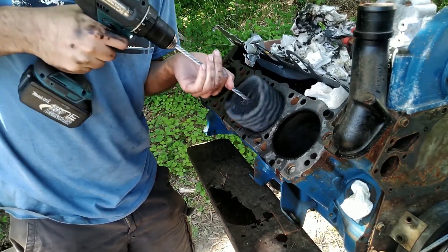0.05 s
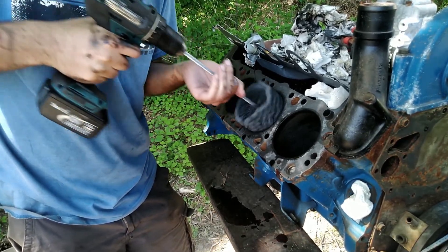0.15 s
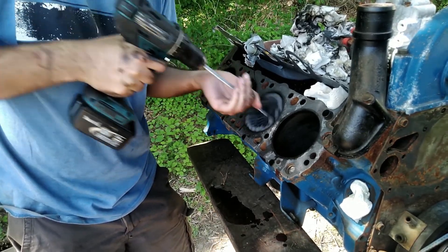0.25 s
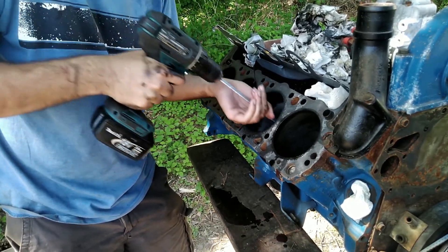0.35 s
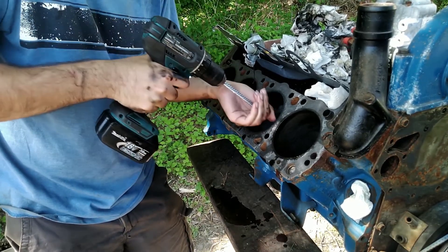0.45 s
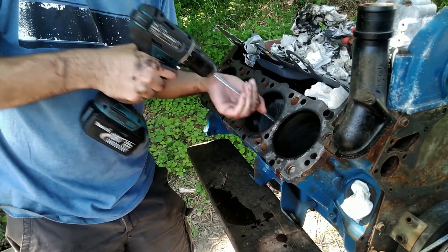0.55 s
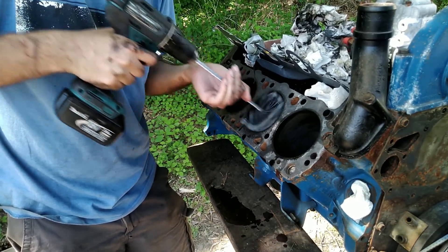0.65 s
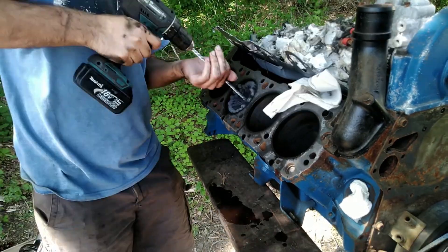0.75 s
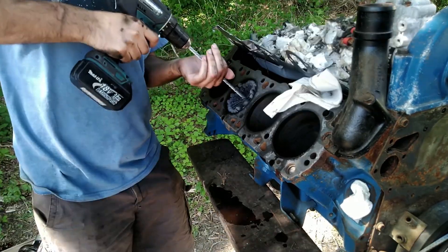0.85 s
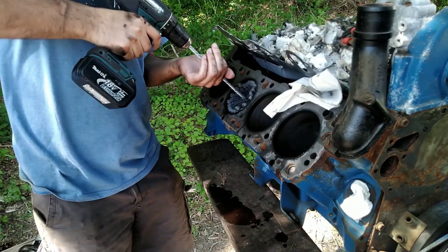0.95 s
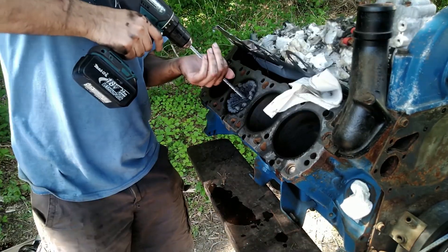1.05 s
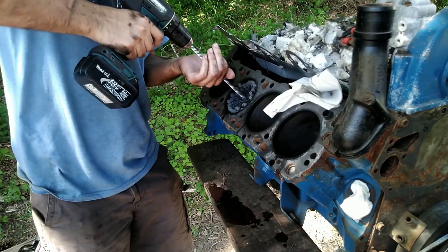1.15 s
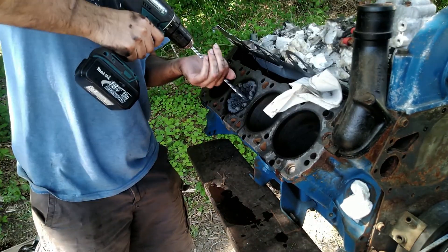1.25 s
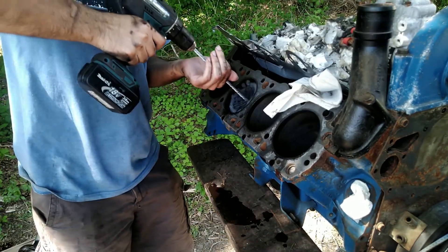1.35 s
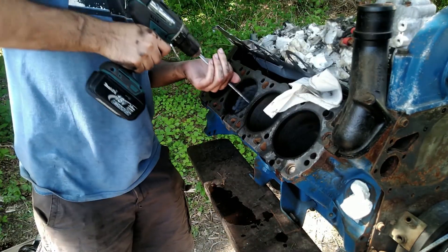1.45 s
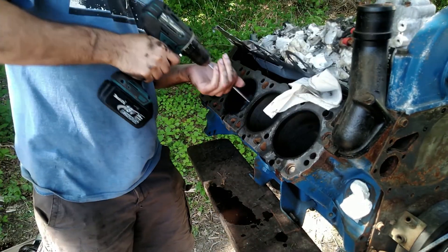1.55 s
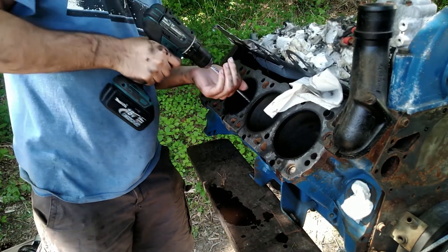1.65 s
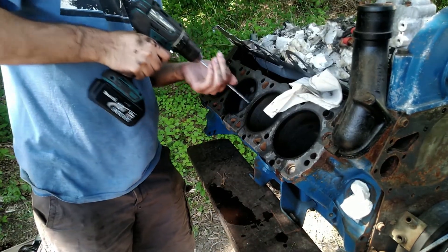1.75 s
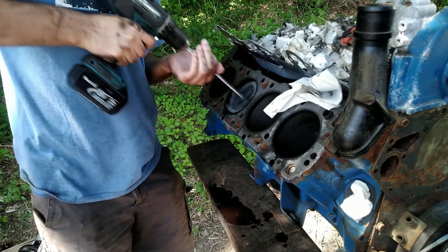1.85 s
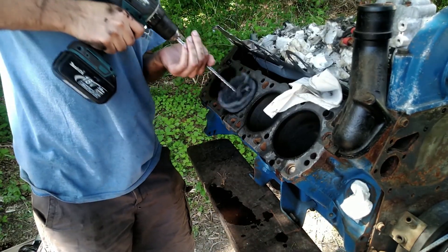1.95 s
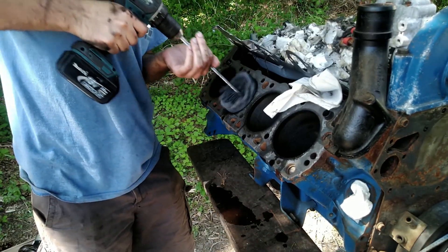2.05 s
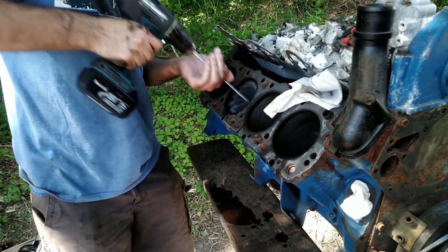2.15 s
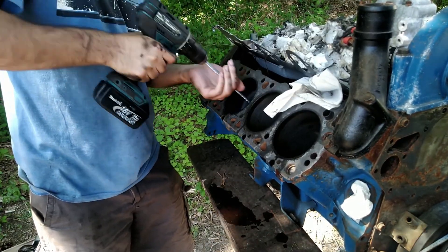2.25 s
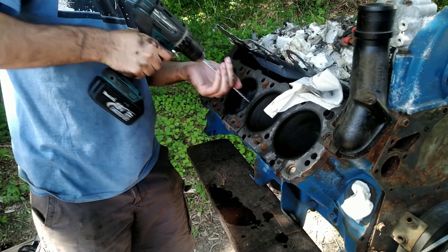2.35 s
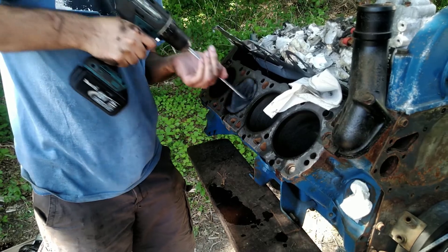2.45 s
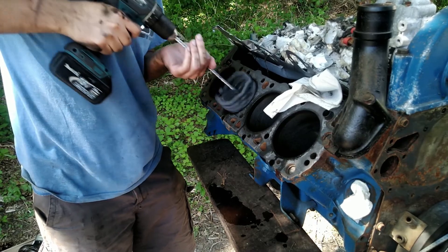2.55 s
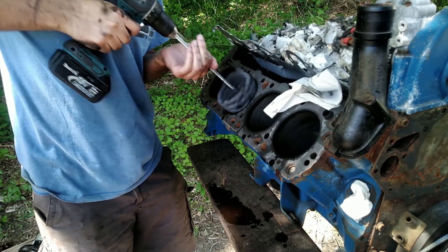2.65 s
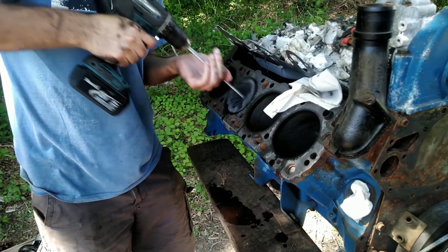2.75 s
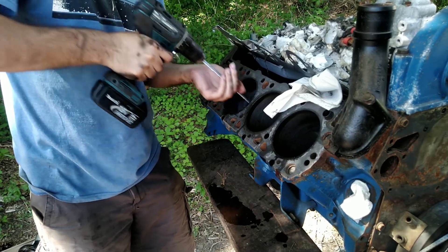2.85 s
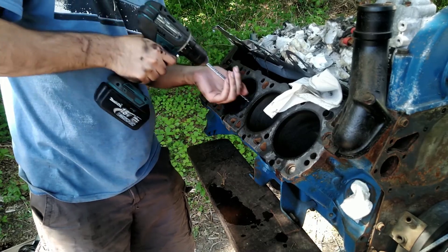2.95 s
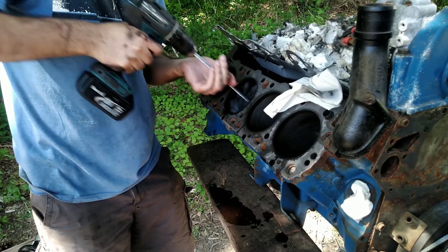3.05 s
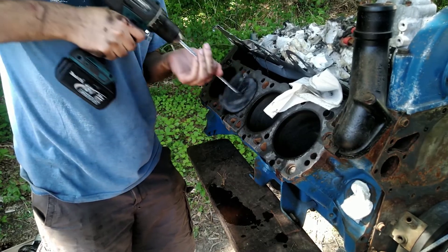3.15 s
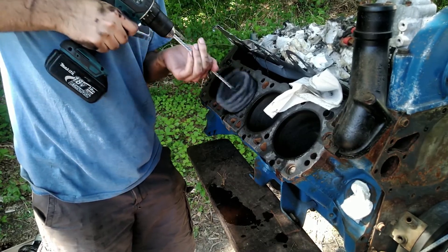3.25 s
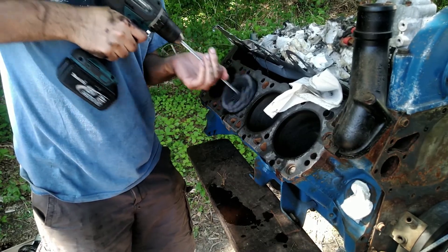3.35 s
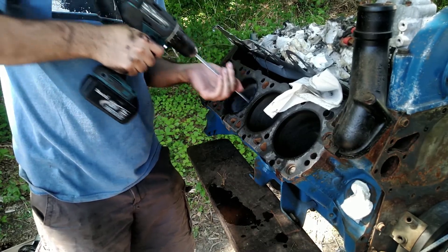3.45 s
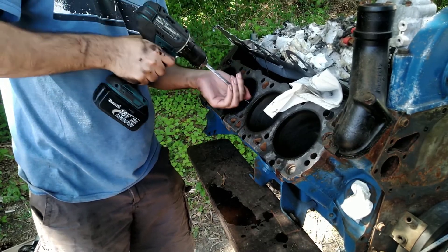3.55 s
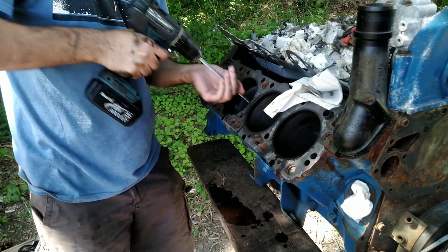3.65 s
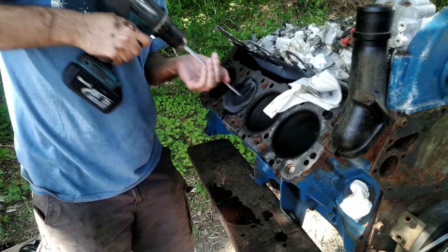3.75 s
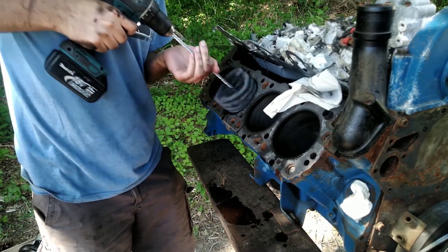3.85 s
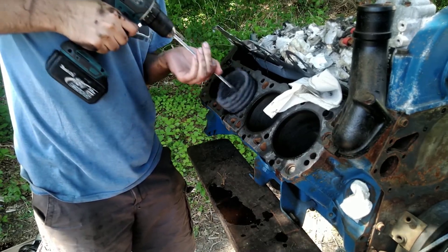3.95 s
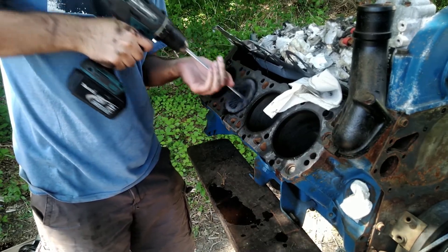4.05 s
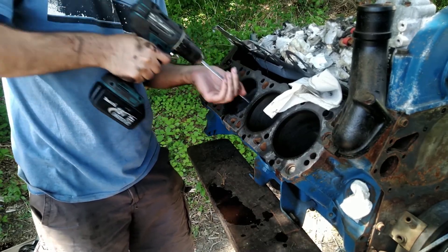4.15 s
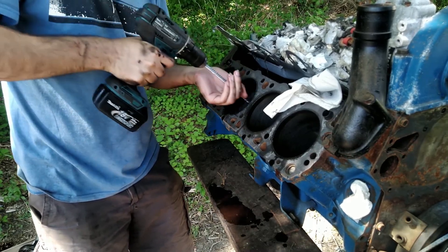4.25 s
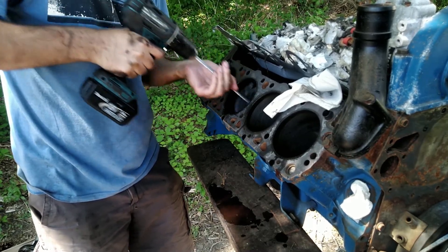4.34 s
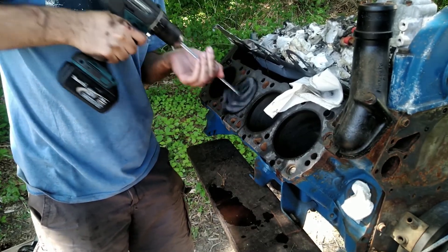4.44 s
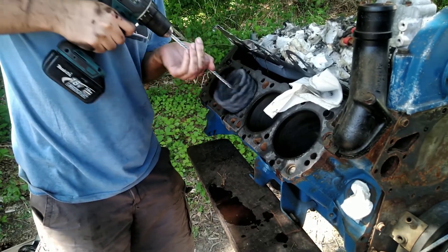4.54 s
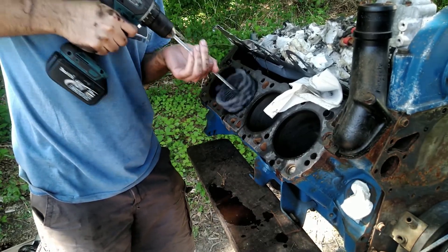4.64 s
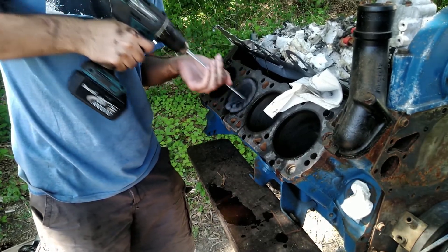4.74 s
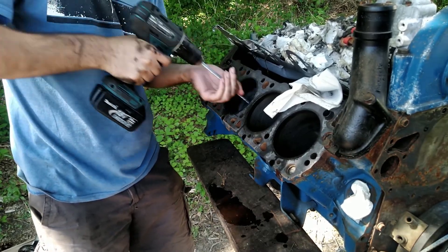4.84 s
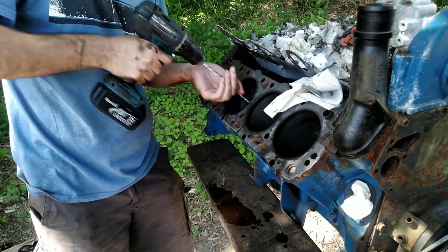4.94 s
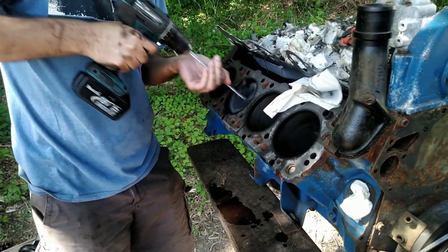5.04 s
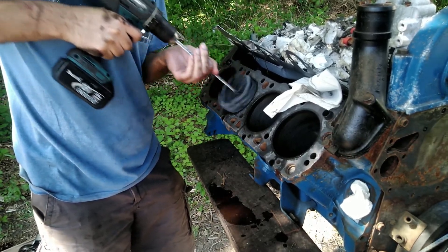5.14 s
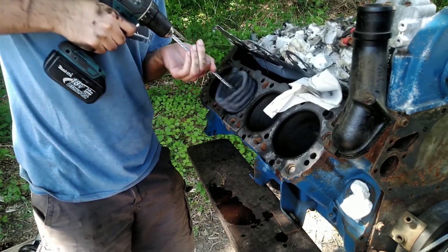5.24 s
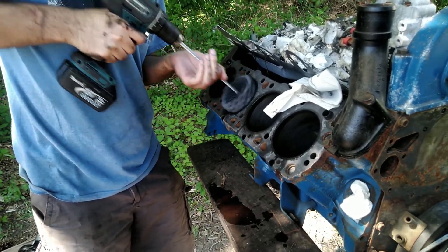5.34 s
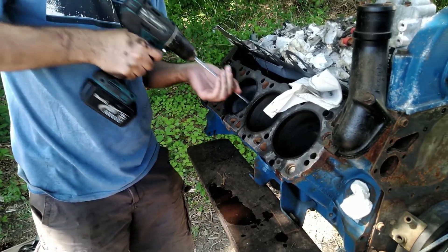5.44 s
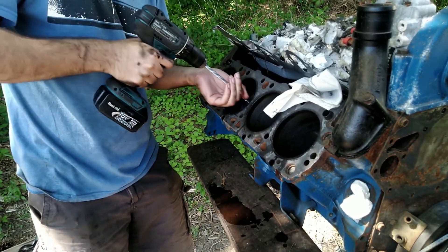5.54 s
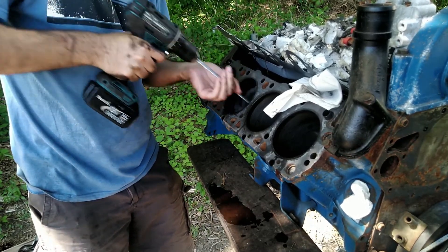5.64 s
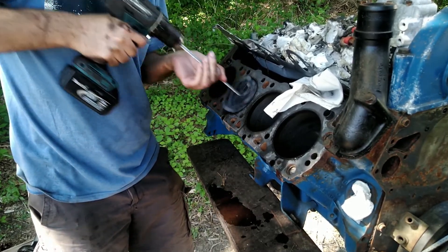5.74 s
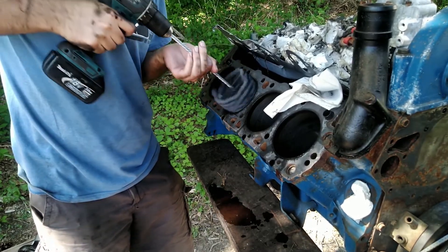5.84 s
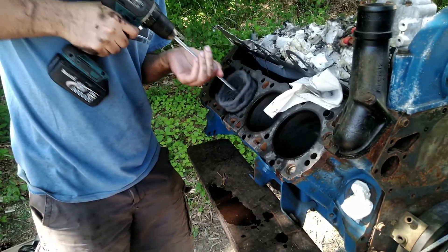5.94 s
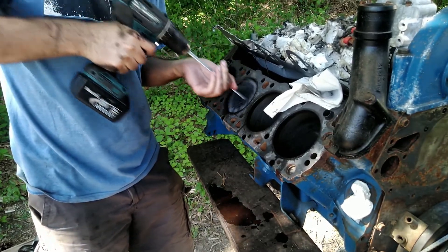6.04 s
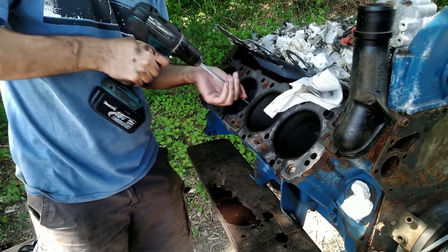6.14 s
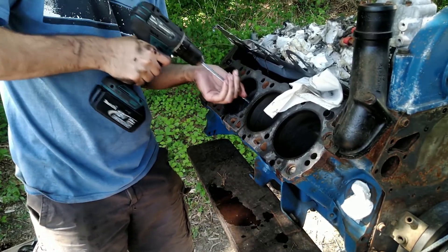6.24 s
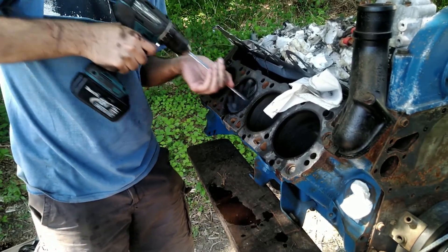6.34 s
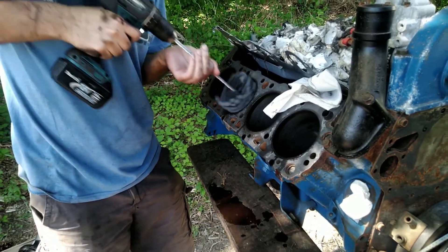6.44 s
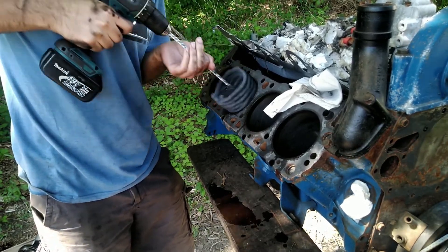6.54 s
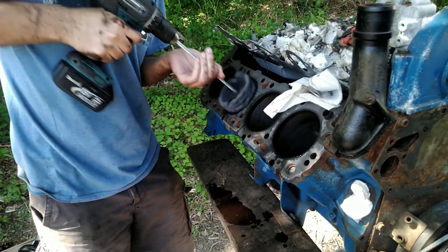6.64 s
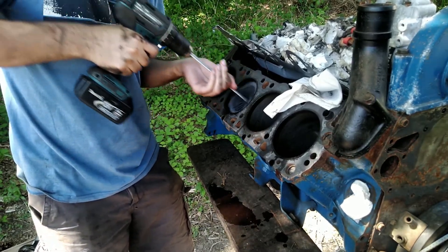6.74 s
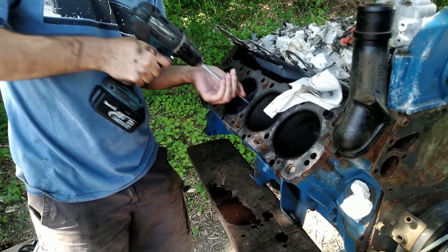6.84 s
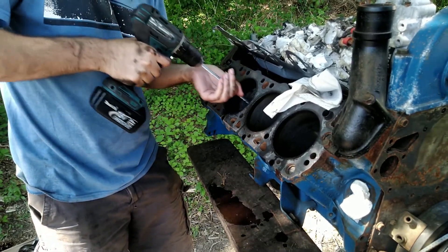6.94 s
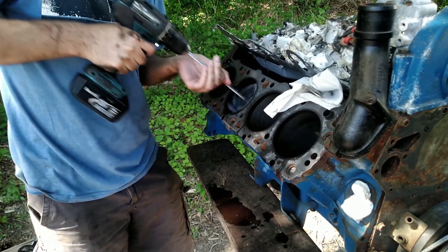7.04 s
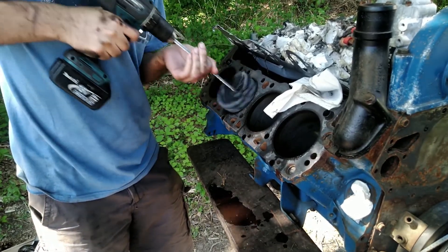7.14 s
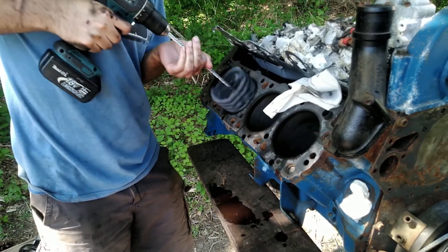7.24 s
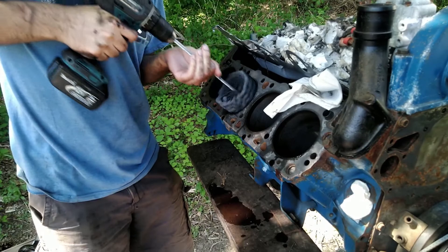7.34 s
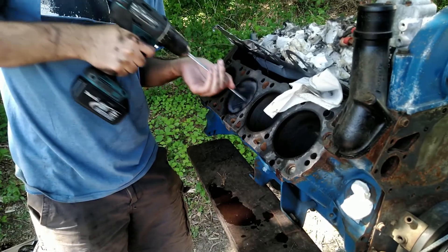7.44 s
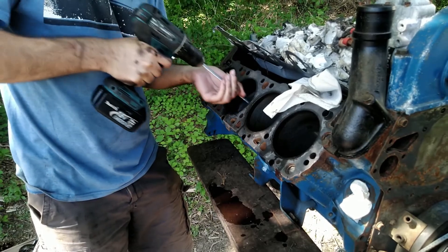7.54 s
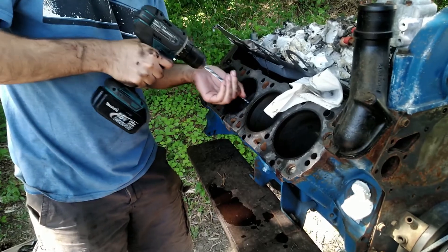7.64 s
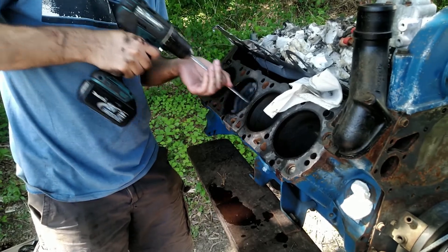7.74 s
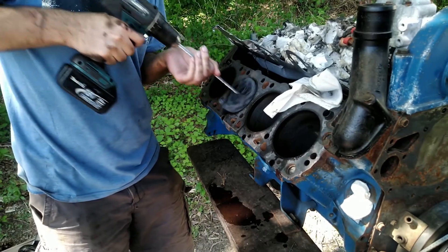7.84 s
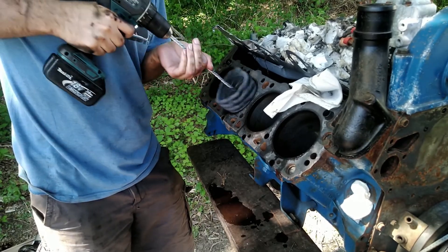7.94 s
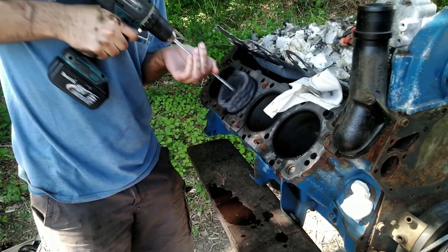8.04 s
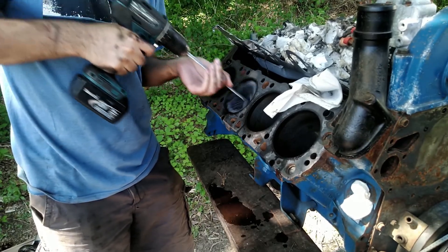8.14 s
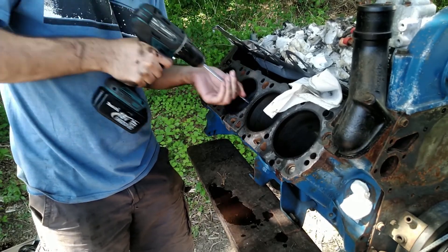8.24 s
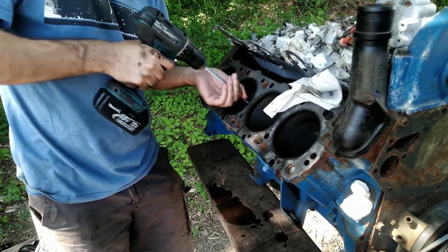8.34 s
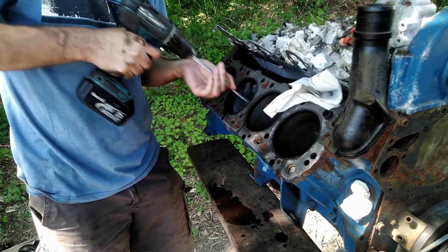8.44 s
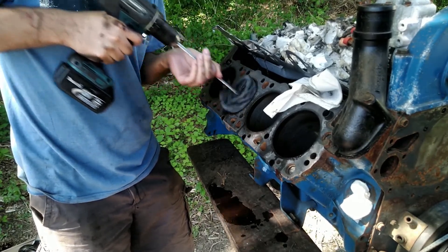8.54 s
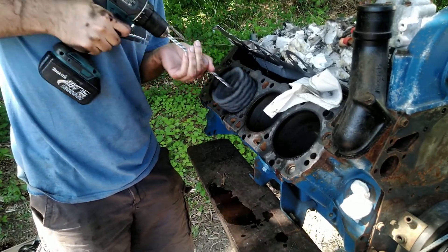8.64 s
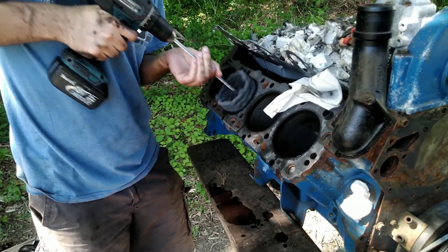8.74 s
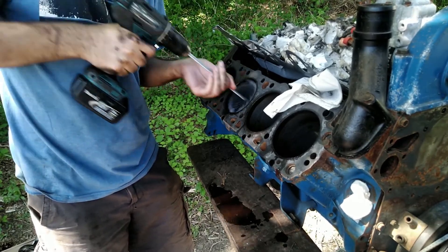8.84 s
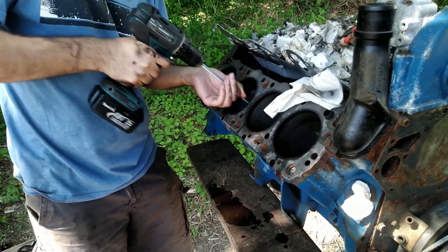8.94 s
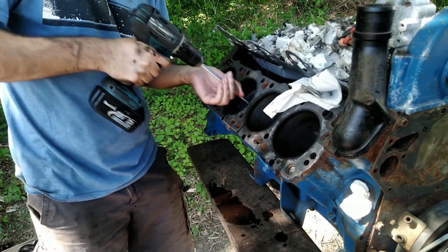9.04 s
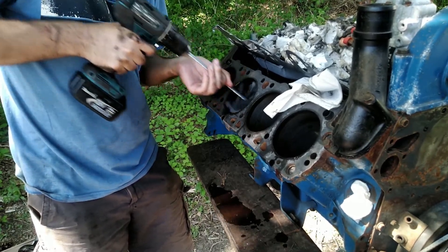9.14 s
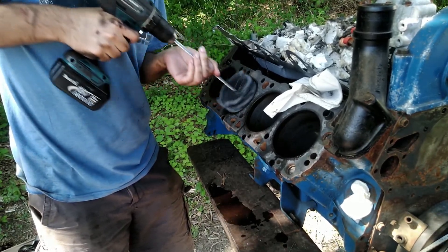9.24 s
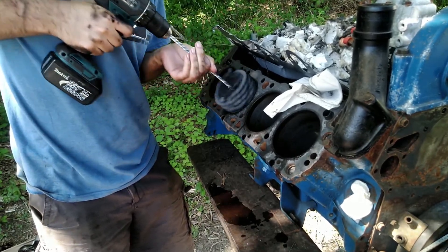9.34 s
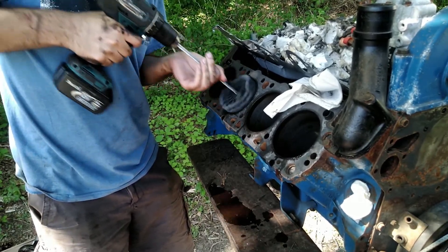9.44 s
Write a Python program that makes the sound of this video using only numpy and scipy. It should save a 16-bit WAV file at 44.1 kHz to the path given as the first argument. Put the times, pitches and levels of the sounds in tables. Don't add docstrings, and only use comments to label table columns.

```python
import sys
import numpy as np
from scipy import signal
from scipy.fft import rfft, irfft, next_fast_len
from scipy.io import wavfile
from scipy.ndimage import uniform_filter1d

SR = 44100
rng = np.random.default_rng(int(sys.argv[2]) if len(sys.argv) > 2 else 0)


def gain_from_decibels(decibels):
    exponent = np.asarray(decibels, float) / 20
    return 10 ** exponent


def store_wav(level_fs):
    pcm = np.round(np.clip(np.atleast_2d(level_fs), -1, 1) * 32767)
    wavfile.write(sys.argv[1], SR, pcm.T.astype(np.int16))


N = 418509

# (time [s], rise [dB], swell [s], fade [s])
RIM_STROKES = [(.07, 3.5, 0.17, .23), (.509, 6.5, 0.064, 0.044), (.639, 7, 0.029, 0.064),
               (.713, 3.5, .1, 0.16), (1.696, 8, 0.083, 0.093), (1.9, 6.5, 0.11, .25),
               (2.27, 7.5, 0.12, .22), (2.544, 7, 0.16, 0.074), (2.938, 9, 0.053, .05),
               (3.158, 6.5, 0.11, 0.23), (3.622, 10, .07, 0.068), (3.801, 7.5, 0.064, .1),
               (4.305, 6.5, 0.12, .04), (4.5, 6.5, .13, 0.079), (4.904, 9, .09, 0.076),
               (5.153, 7, .28, .11), (5.587, 7.5, 0.068, 0.15), (5.782, 9, .12, 0.086), (6.251, 7, .05, .1),
               (6.455, 8, .1, 0.081), (6.954, 12, 0.082, 0.045), (7.094, 6.5, 0.051, 0.18),
               (7.288, 3.5, 0.057, 0.2), (7.688, 13.5, .1, .045), (7.847, 7, .08, .17),
               (8.306, 6.5, 0.037, .045), (8.381, 6, 0.052, 0.041), (8.551, 7, 0.074, .12),
               (9.044, 7.5, 0.13, 0.061), (9.234, 6.5, 0.089, 0.12)]
# (time [s], rise [dB])
SHORT_SWELLS = [(.43, 0.5), (2.744, 1.5), (2.9, 6.5), (3.57, 4.5), (3.981, 4.5), (4.649, 4), (5.313, 4),
                (5.5, 2.5), (5.96, 4.5), (6.645, 3.5), (7.6, 3.5), (8.042, 4), (8.73, 4), (9.48, 4.5)]
# (frequency [Hz], density [dB per Hz])
GRIT_COLOUR = [(3500, -32), (5000, -11), (5840, -14.5), (6790, -7), (8060, -8.5), (9930, 1), (10600, -0.5),
               (12700, -10), (14500, -14), (15100, -16), (15300, -30), (16100, -68)]
# (frequency [Hz], density [dB per Hz])
BEAD_COLOUR = [(4500, -28), (7000, -12.5), (9000, -5), (10600, 4), (12200, -6.5), (14500, -15),
               (15800, -6.5), (16100, -63)]
# (time [s], peak [dB])
BEAD_SLAPS = [(1.697, -13.5), (1.7504, -15), (1.8911, -14.5), (1.942, -16), (2.7412, -20.5), (2.9362, -15),
              (3.6107, -17), (3.7384, -19.5), (3.7569, -14), (4.2602, -22), (4.4308, -18.5), (4.8953, -24),
              (5.3128, -15.5), (5.5727, -20), (5.5877, -15), (5.7399, -17.5), (5.7678, -17),
              (5.9713, -16.5), (6.2377, -20), (6.4108, -19), (6.9521, -25), (6.9521, -12), (7.0808, -17),
              (7.0903, -14), (7.6355, -20), (7.6445, -17), (7.6829, -10.5), (7.8456, -16), (8.5021, -19.5),
              (8.546, -15),
              (0.1077, -25), (0.6345, -35), (0.6345, -21), (0.6942, -16), (0.7198, -17.5), (0.7443, -19),
             (1.6715, -22), (3.1253, -20), (3.7933, -14.5), (3.84, -18), (4.4787, -18.5), (4.5186, -20),
             (6.386, -25), (7.159, -21), (7.2782, -19), (7.9334, -21), (8.306, -27), (8.3794, -18),
             (8.5102, -27), (8.5892, -26), (8.96, -22), (9.1915, -21)]
# (time [s], peak [dB])
TRIGGER_CLICK = [
    (1.2351, -46.5),
]
# (time [s], pitch [Hz], level [dB])
SQUEAKS = [
    [(0.85, 10300, -69), (0.958, 10520, -69), (1.01, 9800, -93)],
    [(1.025, 9900, -85), (1.045, 10280, -64), (1.1, 8864, -96)],
    [(.385, 2560, -56), (.397, 2540, -46), (.41, 2590, -44)],
]
# (frequency [Hz], density [dB per Hz])
WHIR_COLOUR = [(210, -62), (350, -9.5), (428, -15), (462, -11), (726, -4), (796, -2.5), (1100, -5.5),
               (1580, -4.5), (1800, -7.5), (2600, -2.5), (3380, -9.5), (5720, -120)]
# (frequency [Hz], density [dB per Hz])
CASING_COLOUR = [(1180, -30), (2000, -9), (2460, -16), (2980, -3.5), (3260, -1), (3910, 3.5), (5100, 3),
                 (5950, -1.5), (6500, -2.5), (8450, 5), (14300, -120)]
# (pitch [Hz], level under casing hiss [dB], start [s])
SWITCH_TONES = [(472.3, -21, 1.1), (590.6, -21, 0), (937, -16.5, 0.98), (3357, -11, 0.15)]
# (time [s], pitch [Hz])
GENTLE_MESH = [
    (0.0, 1700),
    (0.11, 1664),
    (0.33, 1696),
    (0.44, 1634),
    (0.55, 1656),
    (0.66, 1700),
    (0.77, 1735),
]
# (multiple of mesh [ratio], level [dB], start [s], stop [s])
GENTLE_MESH_ORDERS = [(.5, -66, 0, .74), (1, -61, .05, .72), (.875, -65, .32, .72), (1.125, -64, 0, .25),
                      (.36, -71, 0, .76)]
# (time [s], pitch [Hz])
LOADED_MESH = [(1.75, 1930), (2.1, 2072), (2.44, 2317), (2.66, 1970), (2.91, 1880), (3.3, 2085),
               (3.56, 2006), (3.75, 2060), (4.2, 1824), (4.59, 1953), (4.85, 1972), (5.45, 2113),
               (5.85, 2147), (6.0, 1987), (6.78, 1767), (7.3, 1853), (8.33, 1699), (9.49, 1830)]
# (time [s], gain [Hz], swell [s], fade [s])
MOTOR_RACES = [
    (2.25, 140, .15, .13),
    (5.03, 510.6, .18, .19),
    (5.14, 249, 0.22, 0.29),
    (6.54, 145.1, .27, .22),
    (7.72, 350, 0.21, .3),
    (7.85, 374.7, .3, 0.39),
    (8.68, 110.2, .35, .29),
    (9.33, 45, 0.18, 0.22),
]
# (multiple of mesh [ratio], level at usual speed [dB], gain [dB per 100 Hz])
LOUD_ORDERS = [(1, -64, 1.1), (1.125, -64, 2.6), (2, -58.5, 2.1)]
FAINT_ORDERS = list(zip((.4, .8, 1.175, 2.3, 3, 4, 5, 6), (-11.5, -18, -15, -15, -14, -7, -1, -12)))
# (time [s], rumble level [dB], passing engine level [dB])
TRAFFIC_LEVELS = [
    (0.0, -55.5, -68),
    (0.639, -55, -71),
    (0.918, -52.5, -67.5),
    (2.02, -49.5, -69),
    (3.392, -52.3, -67),
    (3.991, -54.5, -67.5),
    (4.54, -48.5, -68),
    (5.463, -54, -65),
    (6.136, -49, -57.5),
    (6.75, -51, -59.5),
    (8.127, -52, -58),
    (9.478, -52, -64.5),
]
# (pitch [Hz], start [s], stop [s], level [dB])
FAR_HUMS = [
    (101, -0.5, 10, -63.5),
    (34.4, 3.5, 3.32, -61),
    (73.3, 2.5, 5.1, -65),
    (78.6, 6, 6.7, -62),
    (36, 7, 9, -62.5),
    (72.1, 7, 8.84, -58),
]
# (frequency [Hz], density [dB per Hz])
RUMBLE_COLOUR = [(8.8, -39), (15, 4), (32, 8), (70, 5), (108, -6.5), (140, -27.5), (180, -57), (310, -120)]
# (frequency [Hz], density [dB per Hz])
ENGINE_COLOUR = [(65, -34), (110, 6.5), (129, 1), (274, -5), (383, -12.5), (463, -9), (500, -12.5),
                 (650, -10), (1100, -120)]
# (frequency [Hz], density [dB per Hz])
AIR_COLOUR = [(180, -60), (300, -7), (383, -3), (884, 0), (2280, -9), (5530, -47), (8320, -19), (10300, -5),
              (12700, -18), (15000, -57)]
# (frequency [Hz], shared part [0-1])
PORT_LIKENESS = [(60, 0.95), (250, 0.88), (500, 0.6), (1000, 0.8), (2000, 0.47), (3000, 0.31),
                 (4000, 0.077), (6000, 0.5), (8500, 0.028), (11000, 0.065), (14000, 0.18)]
# (frequency [Hz], left minus right [dB])
PORT_BALANCE = [(60, -6), (150, -3.5), (380, -4), (950, -3.5), (2380, -3.5), (5980, -5), (15000, -3)]


def hone():
    t = np.arange(300) / SR
    rise_db = rim_db()
    rim = np.clip((rise_db - 1.0) / 4.7, 0, 1)
    hits = rng.random(N) < 450 / SR
    sizes = gain_from_decibels(3.6 * np.minimum(rng.exponential(1, N), 3.2)) * hits
    chatter = signal.oaconvolve(sizes, np.exp(-t / 0.00057))[:N]
    chatter /= np.sqrt(abs(uniform_filter1d(chatter ** 2, 2000)) + 1e-3)
    chatter_share = np.clip(0.1 + 0.57 * rim, 0, .95)
    hiss = patchy(noise(GRIT_COLOUR, gain_from_decibels(1.1 * wander(size=200))), patchy_db=1.5)
    beads = noise(BEAD_COLOUR, chatter + 0.41)
    scrape = np.sqrt(1 - chatter_share) * hiss + np.sqrt(chatter_share) * beads
    deep_db = -40.65
    return gain_from_decibels(deep_db + rise_db + trigger_db(braked_db=-24, rest_db=-48, catch_db=-14)) * scrape


def rim_db():
    short_s = 0.091
    return peaks(RIM_STROKES + [(s, db, short_s, short_s) for s, db in SHORT_SWELLS])


def slaps(rows, spectrum, ring_s, echo_db):
    t = np.arange(400) / SR
    echoes = np.exp(-t / 0.011) * (1 - np.cos(2 * np.pi * 600 * t)) / 2
    shape = np.exp(-t / ring_s) + gain_from_decibels(echo_db) * echoes
    hits = np.zeros(N)
    s, peak_db = np.transpose(rows)
    hits[np.round((s + .0008) * SR).astype(int)] = gain_from_decibels(peak_db)
    signs = rng.choice([-1., 1.], (2, N))
    bursts = signs * signal.oaconvolve(hits, shape)[:N]
    return coloured(bursts, spectrum) / np.std(coloured(signs, spectrum))


def clicks():
    beads = slaps(BEAD_SLAPS, BEAD_COLOUR, ring_s=0.00088, echo_db=-7.5)
    snap_colour = CASING_COLOUR[:-2] + BEAD_COLOUR[1:]
    return gain_from_decibels(-5.5) * beads + gain_from_decibels(5.5) * slaps(TRIGGER_CLICK, snap_colour, ring_s=0.00075, echo_db=-20)


def drill():
    mesh_hz = uniform_filter1d(curves(LOADED_MESH)[0] + peaks(MOTOR_RACES), size=2500)
    usual_hz = 2000
    faster = np.minimum(mesh_hz - usual_hz, 480) / 100
    return motor(faster) + gentle_gears() + loaded_gears(mesh_hz, faster)


def motor(faster):
    shake_db = np.maximum(uniform_filter1d(rim_db(), size=4000) - 3.0, 0)
    whir_db = -54.5 + 0.48 * faster + 0.24 * shake_db
    whir_db += trigger_db(braked_db=-9.5, rest_db=-22.5, catch_db=-7.5)
    casing_db = -48.5 + 0.17 * faster + 0.54 * shake_db
    casing_db += trigger_db(braked_db=-16.5, rest_db=-29.5, catch_db=-11)
    out = gain_from_decibels(whir_db) * noise(WHIR_COLOUR, gain_from_decibels(0.96 * wander(size=300)))
    out += gain_from_decibels(casing_db) * patchy(noise(CASING_COLOUR), patchy_db=1.06)
    for hz, db, start in SWITCH_TONES:
        running = np.arange(N) / SR >= start
        level = gain_from_decibels(casing_db - 6.0 + db + 2.8 * wander(size=6000))
        out += running * level * tone(hz, 6.0 + hz / 120)
    return out


def gentle_gears():
    mesh_hz, = curves(GENTLE_MESH)
    out = np.zeros((2, N))
    for k, db, start, stop in GENTLE_MESH_ORDERS:
        out += during([(start,), (stop,)], .05) * gain_from_decibels(db) * tone(k * mesh_hz, 7.6 * k + 4.4)
    return out


def loaded_gears(mesh_hz, faster):
    mesh, whine = np.zeros((2, N)), np.zeros((2, N))
    for k, db, gain_db in LOUD_ORDERS:
        level = gain_from_decibels(db + gain_db * faster + 1.7 * wander(size=2000))
        mesh += level * tone(k * mesh_hz, 6.89 * k + 4.13)
    for k, db in FAINT_ORDERS:
        whine += gain_from_decibels(-55.5 + 1.0 * faster + db) * tone(k * mesh_hz, 4.0 * k)
    fade_db_per_s = -.7
    waning = gain_from_decibels(fade_db_per_s * (np.arange(N) / SR - LOADED_MESH[0][0]))
    return during(LOADED_MESH, .05) * (waning * mesh + whine)


def trigger_db(braked_db, rest_db, catch_db):
    release_s, rest_s, pull_s, full_s = .759, .863, 1.222, 1.63
    brake_s, settle_s, catch_s = .008, .04, .03
    s = [release_s, release_s + brake_s, rest_s, rest_s + settle_s, pull_s, pull_s + catch_s, full_s]
    return np.interp(np.arange(N) / SR, s, [0, braked_db, braked_db - 2.5, rest_db, rest_db, catch_db, 0])


def squeak():
    out = np.zeros((2, N))
    for rows in SQUEAKS:
        hz, db = curves(rows)
        out += during(rows, 0.009) * gain_from_decibels(db) * tone(hz, 64.0)
    return out


def outdoors():
    rumble_db, engine_db = curves(TRAFFIC_LEVELS)
    out = gain_from_decibels(rumble_db - 5.0) * noise(RUMBLE_COLOUR)
    out += gain_from_decibels(engine_db) * noise(ENGINE_COLOUR)
    out += gain_from_decibels(-70) * noise(AIR_COLOUR)
    for hz, start, stop, db in FAR_HUMS:
        turn = 2 * np.pi * np.cumsum(hz + .5 * wander(size=9000)) / SR
        level = gain_from_decibels(db + 2.5 * wander(size=5000))
        out += during([(start,), (stop,)], .3) * level * np.sin(turn)
    return out


def tone(hz, blur_hz):
    turn = 2 * np.pi * np.cumsum(hz + blur_hz * wander(size=400)) / SR
    fading = gain_from_decibels(2.5 * np.array([wander(size=1200), wander(size=1200)]))
    return np.sqrt(2) * fading * np.array([np.sin(turn), np.cos(turn)])


def noise(spectrum, grain=1.):
    return evened(coloured(rng.standard_normal((2, N)) * grain, spectrum))


def coloured(pair, spectrum):
    size = next_fast_len(N)
    hz = np.fft.rfftfreq(size, 1 / SR)
    return irfft(rfft(pair, size) * gain_from_decibels(read(spectrum, hz)), size)[:, :N]


def patchy(pair, patchy_db):
    z = signal.stft(pair, nperseg=512)[2]
    grains = rng.standard_normal(z.shape[:0:-1]).T
    patches = uniform_filter1d(uniform_filter1d(grains, 6, 0), 12, 1)
    return evened(signal.istft(z * gain_from_decibels(patchy_db * evened(patches)), nperseg=512)[1][:, :N])


def wander(size):
    coarse = rng.standard_normal(N // 20 + 2)
    coarse = uniform_filter1d(uniform_filter1d(coarse, size // 20), size // 20)
    return np.interp(np.arange(N) / 20, np.arange(len(coarse)), evened(coarse))


def peaks(rows):
    t = np.arange(N) / SR
    bumps = [np.interp(t, [s - swell, s, s + fade], [0, height, 0]) for s, height, swell, fade in rows]
    return np.max(bumps, axis=0)


def curves(rows):
    s, *columns = np.transpose(rows)
    return [np.interp(np.arange(N) / SR, s, c) for c in columns]


def during(rows, fade):
    start, stop = rows[0][0], rows[-1][0]
    return np.interp(np.arange(N) / SR, [start - fade, start, stop, stop + fade], [0, 1, 1, 0])


def read(points, hz):
    f, value = np.transpose(points)
    return np.interp(np.log(hz + 1), np.log(f + 1), value)


def evened(x):
    return x / np.sqrt(np.mean(x ** 2) + 1e-20)


def scene():
    return hone() + clicks() + drill() + squeak() + outdoors()


def roll_off(x):
    return signal.sosfilt(signal.butter(12, 16160, fs=SR, output="sos"), x)


def record(dry):
    lag_s, edge_hz = 1.55e-4, 15950
    size = next_fast_len(N)
    hz = np.fft.rfftfreq(size, 1 / SR)
    direct, scattered = rfft(dry, size)
    same = np.clip(read(PORT_LIKENESS, hz), 0, 1)
    late = direct * np.exp(-2j * np.pi * hz * lag_s)
    left = same * late + np.sqrt(1 - same ** 2) * scattered
    lean_db = read(PORT_BALANCE, hz) / 2
    ports = np.array([left * gain_from_decibels(lean_db), direct * gain_from_decibels(-lean_db)]) * (hz < edge_hz)
    mix = gain_from_decibels(3.0) * irfft(ports, size)[:, :N]
    return roll_off(mix)


dry = scene()
out = record(dry)
store_wav(out)
```